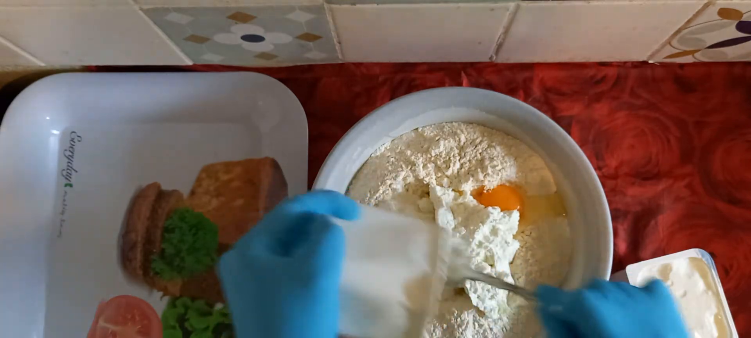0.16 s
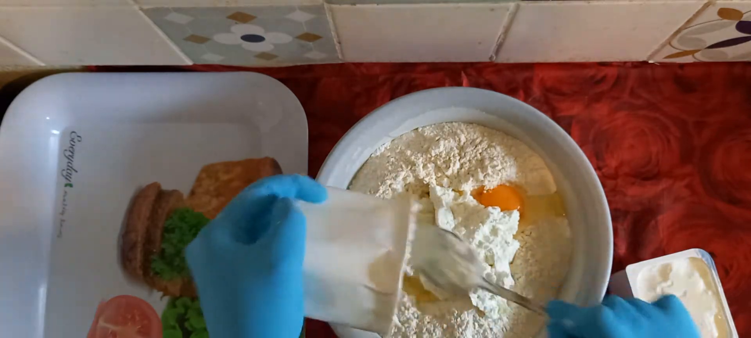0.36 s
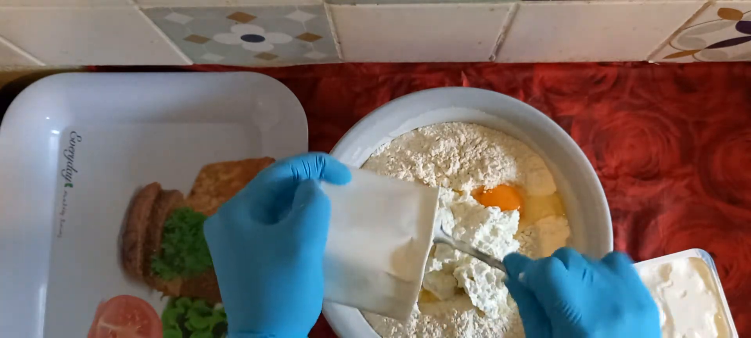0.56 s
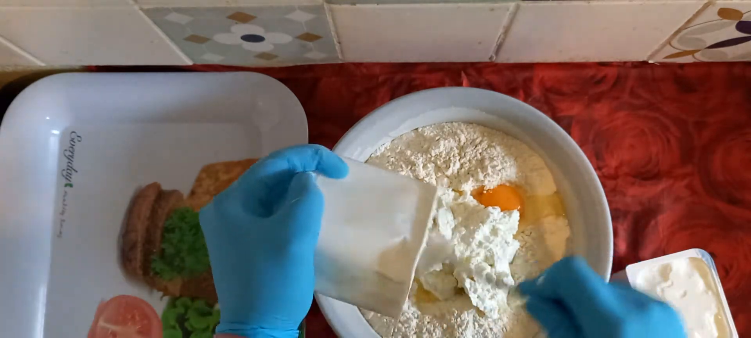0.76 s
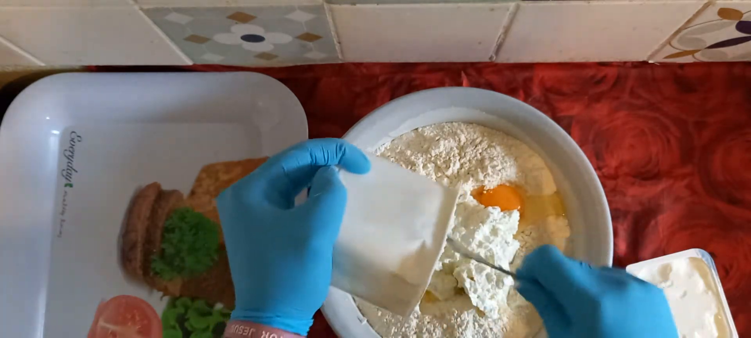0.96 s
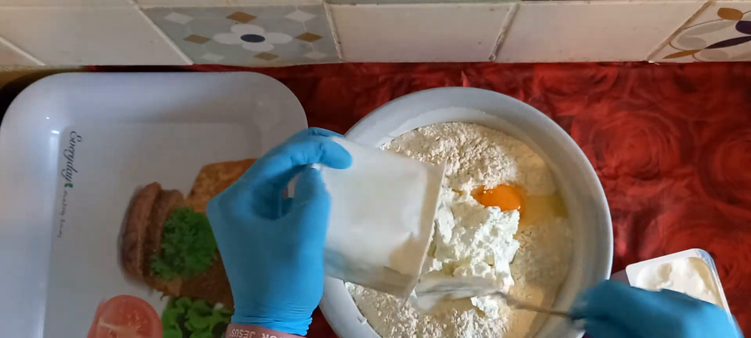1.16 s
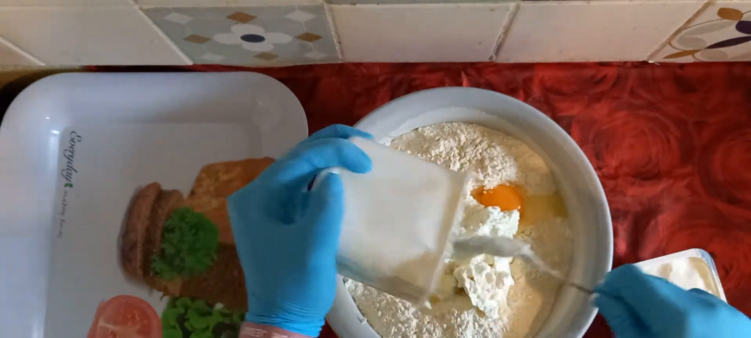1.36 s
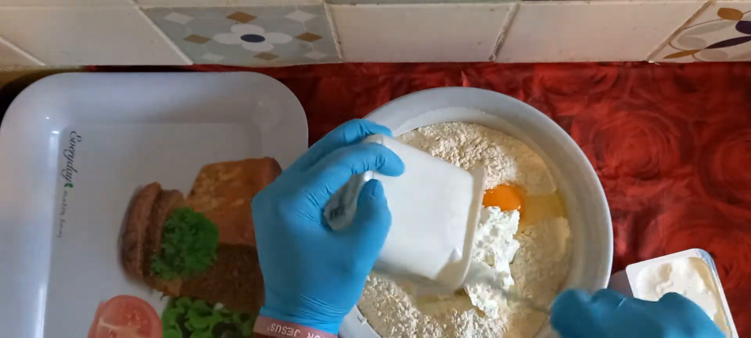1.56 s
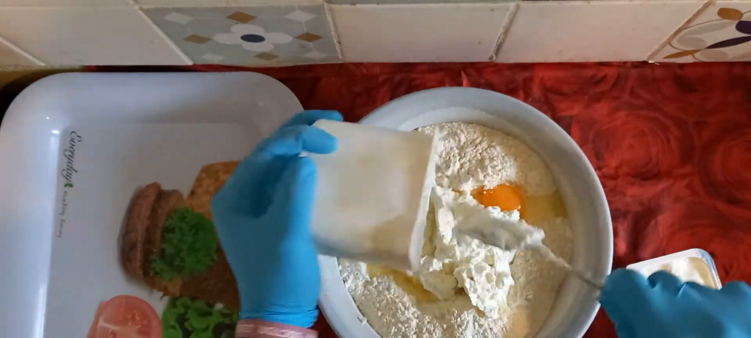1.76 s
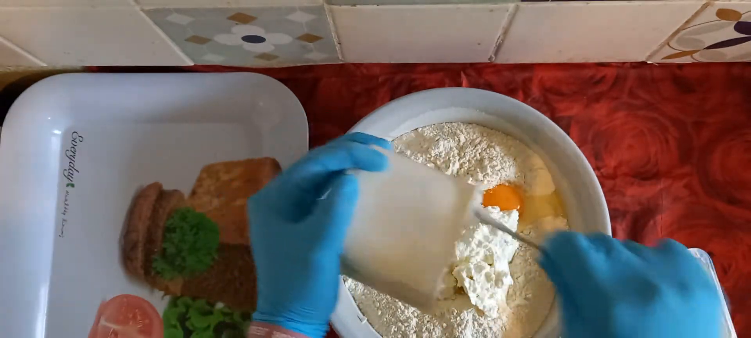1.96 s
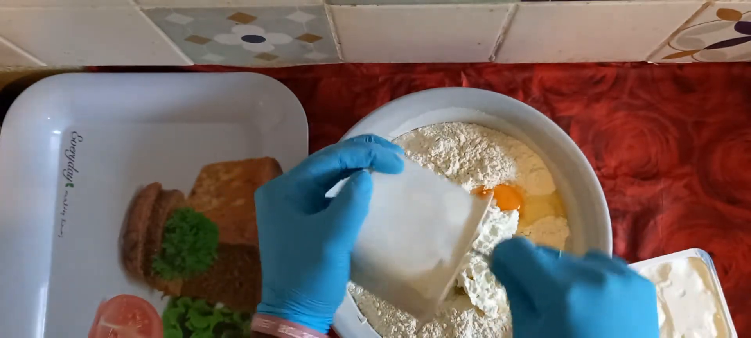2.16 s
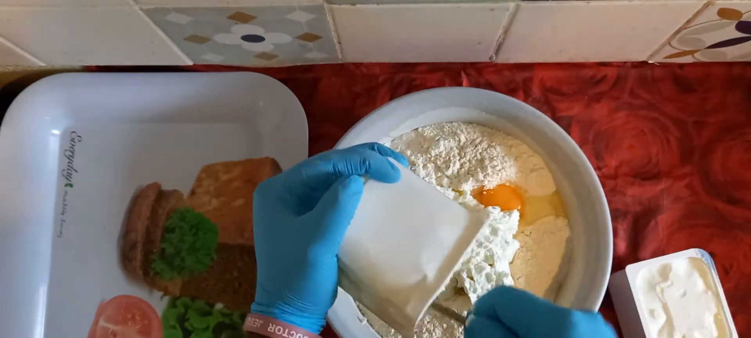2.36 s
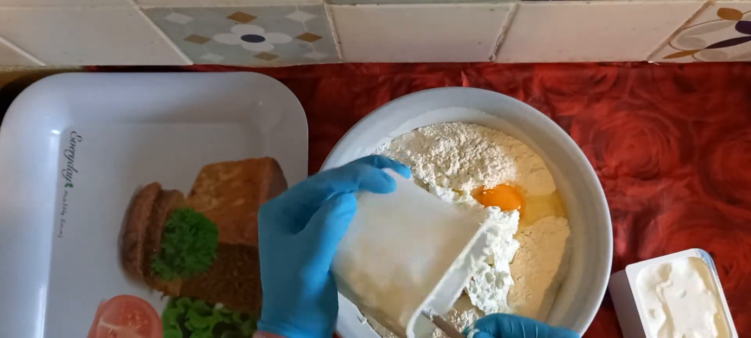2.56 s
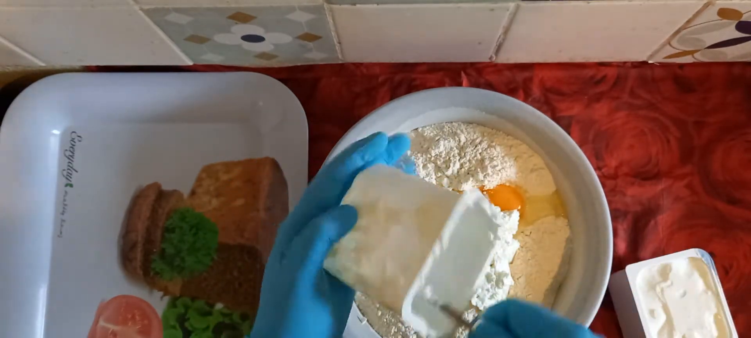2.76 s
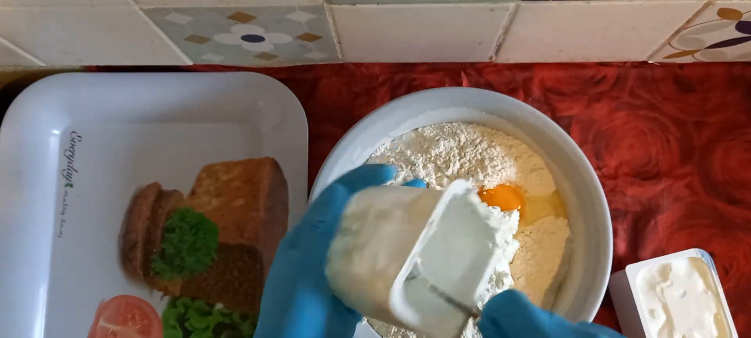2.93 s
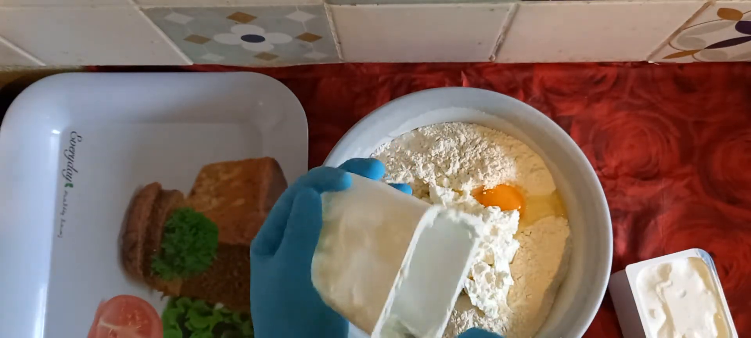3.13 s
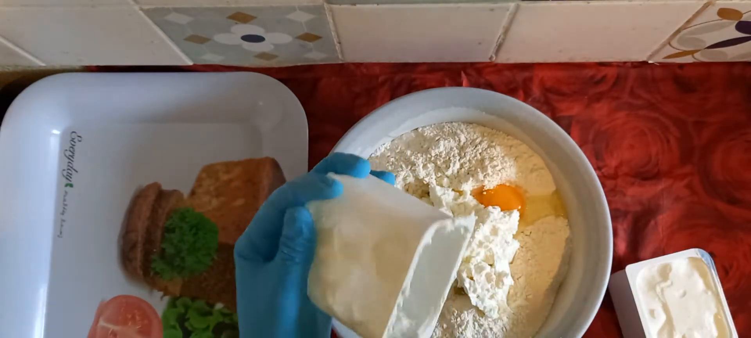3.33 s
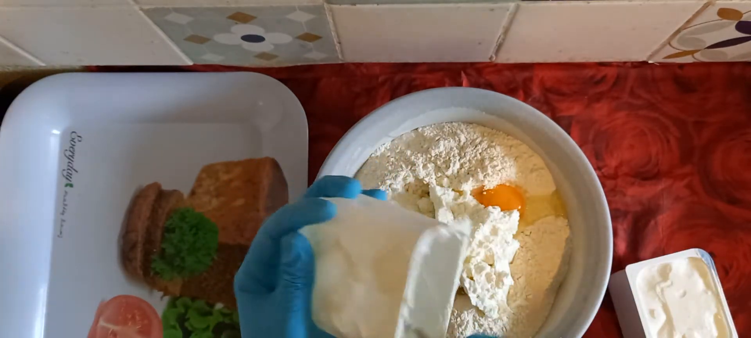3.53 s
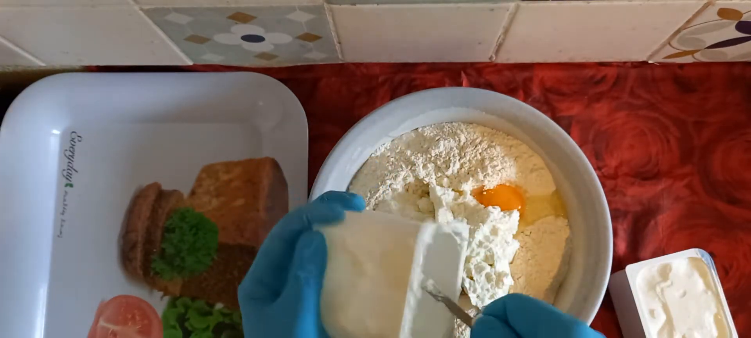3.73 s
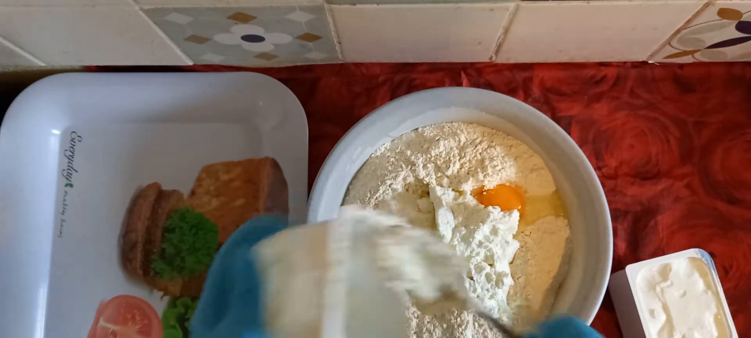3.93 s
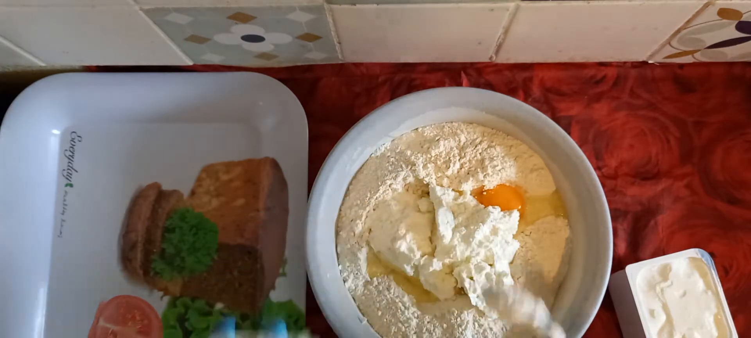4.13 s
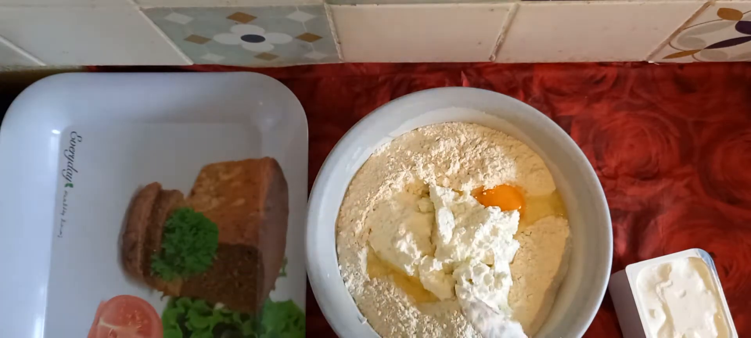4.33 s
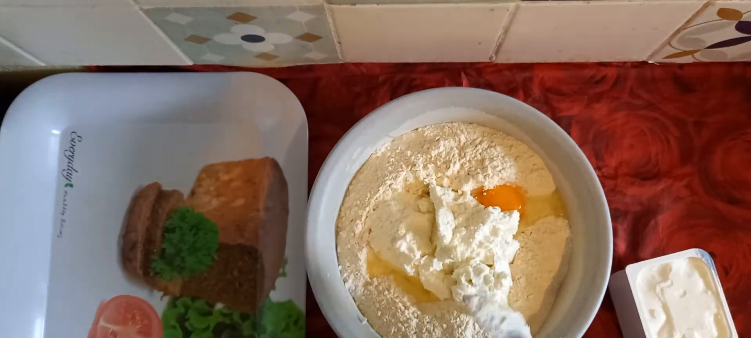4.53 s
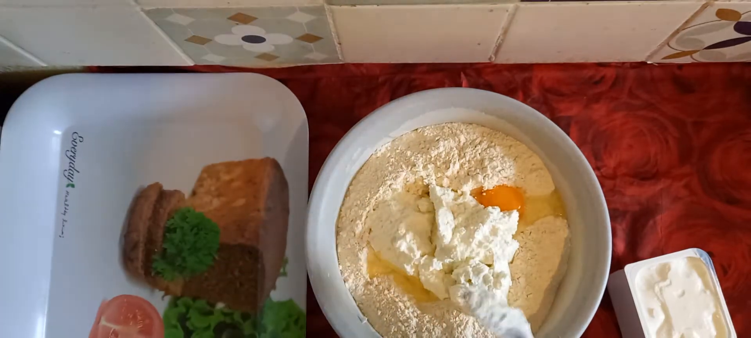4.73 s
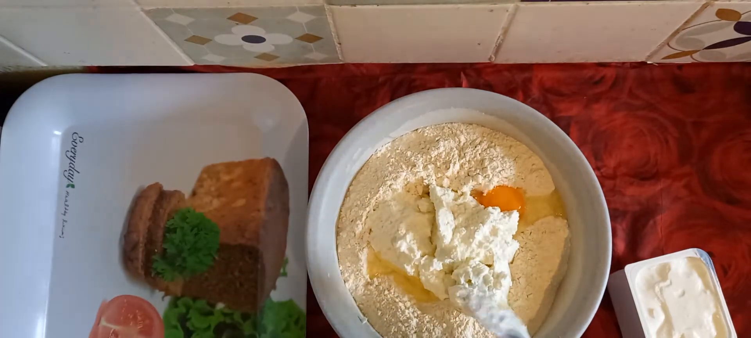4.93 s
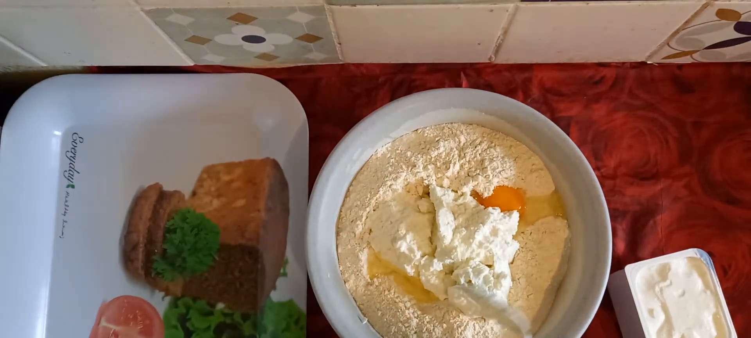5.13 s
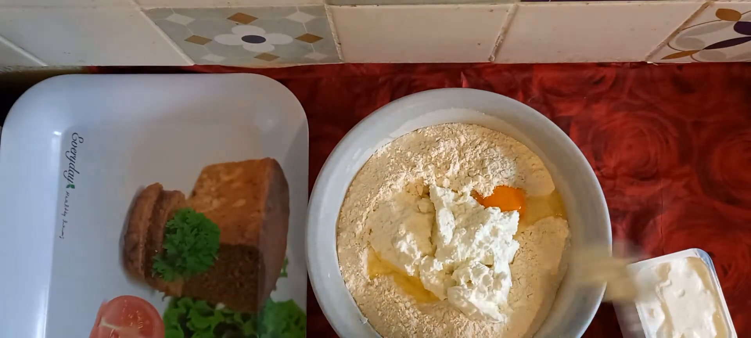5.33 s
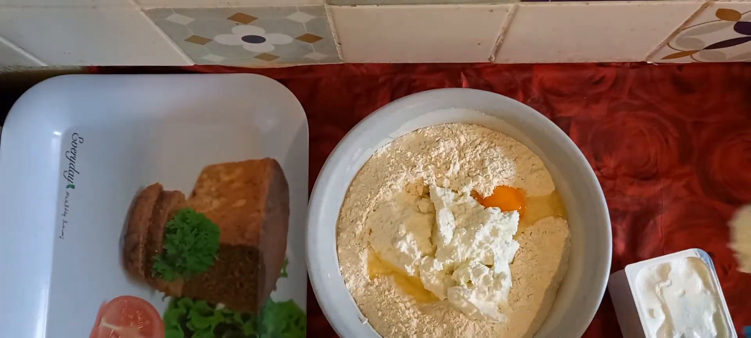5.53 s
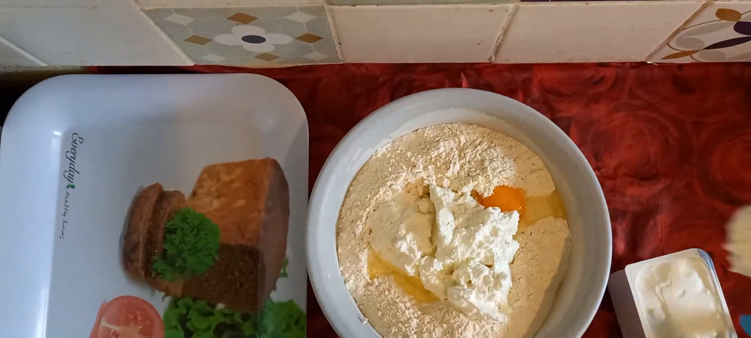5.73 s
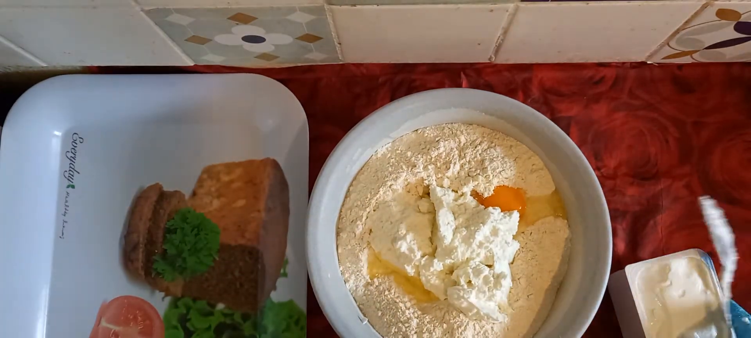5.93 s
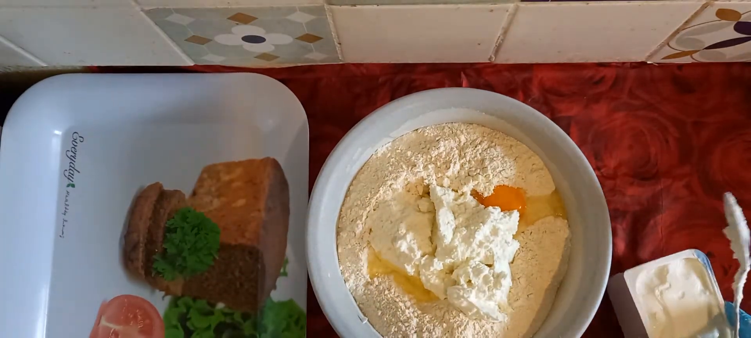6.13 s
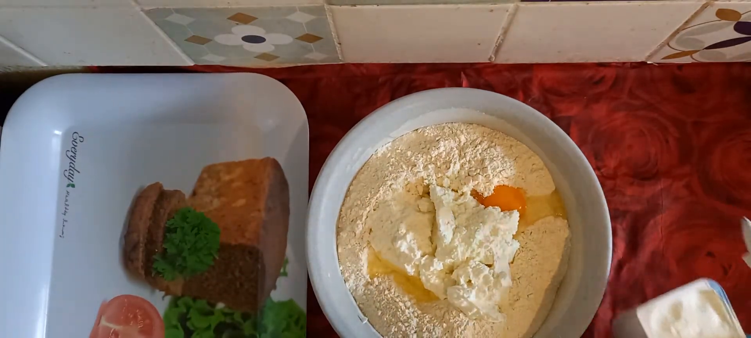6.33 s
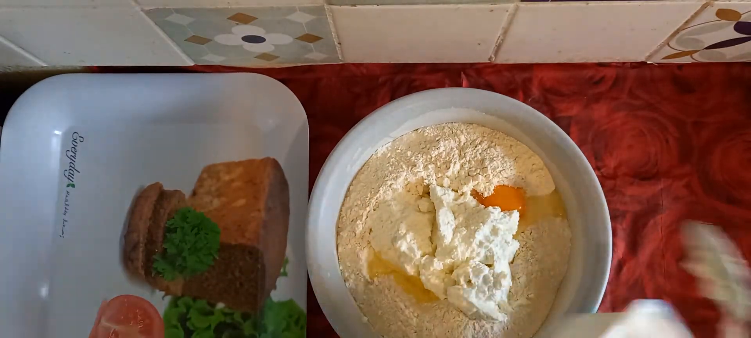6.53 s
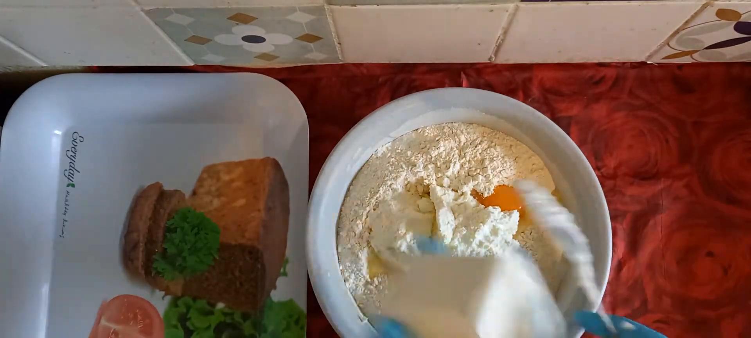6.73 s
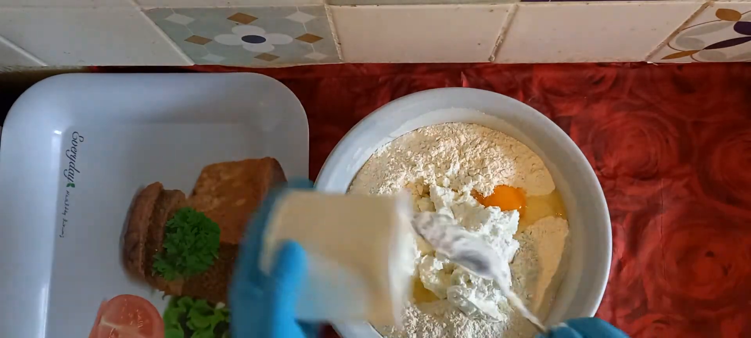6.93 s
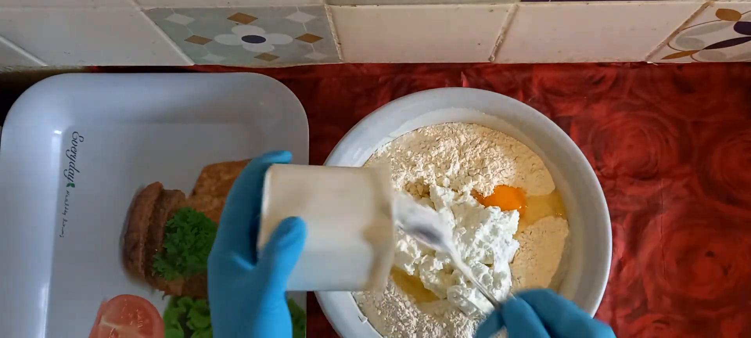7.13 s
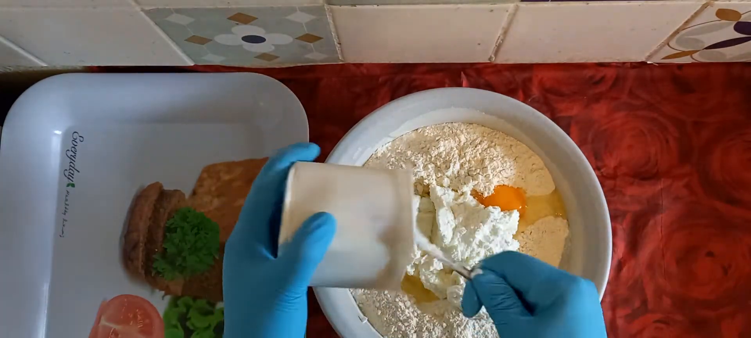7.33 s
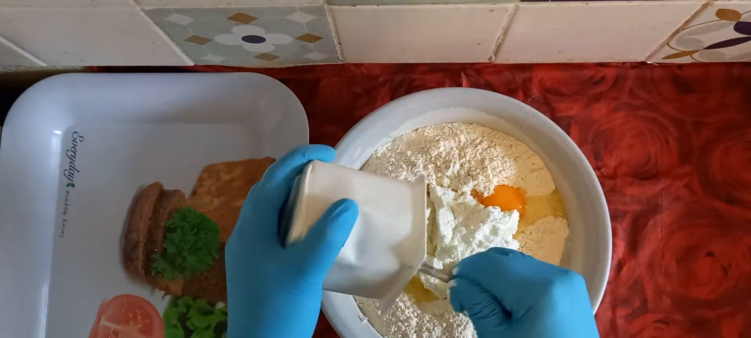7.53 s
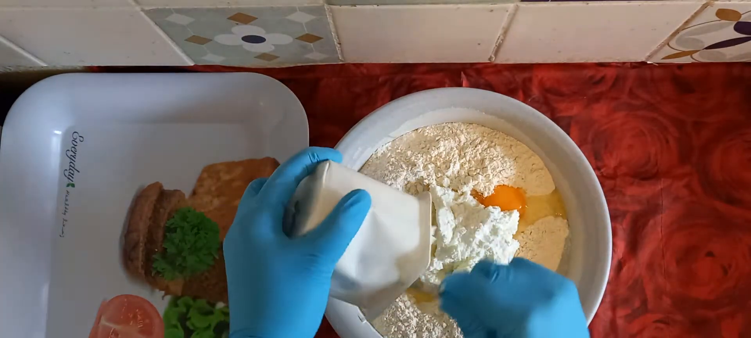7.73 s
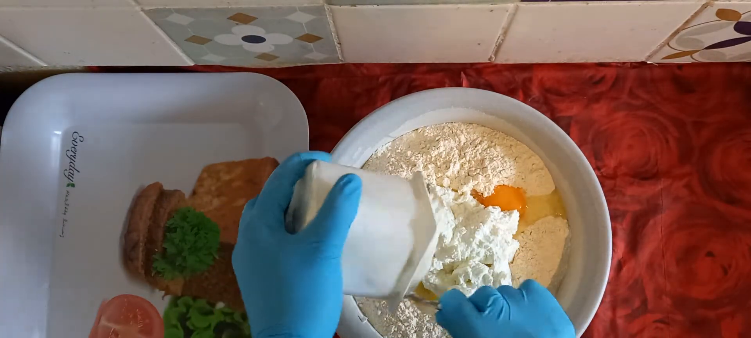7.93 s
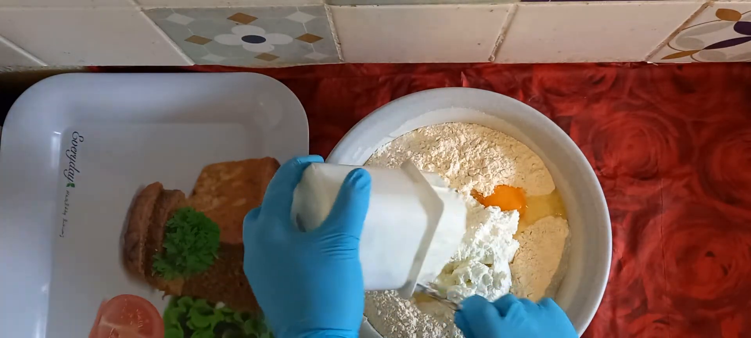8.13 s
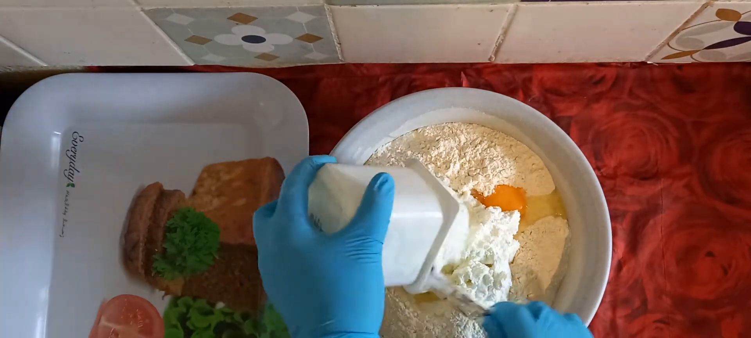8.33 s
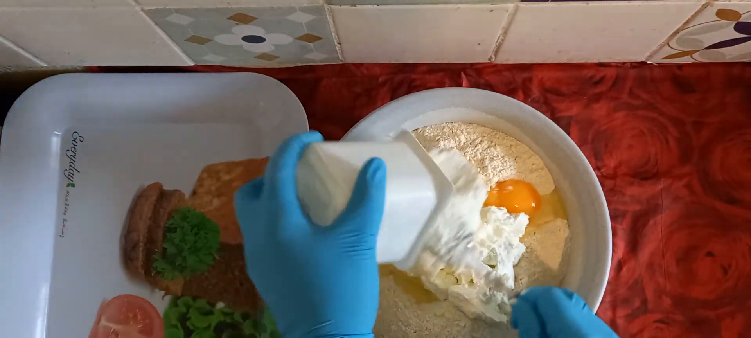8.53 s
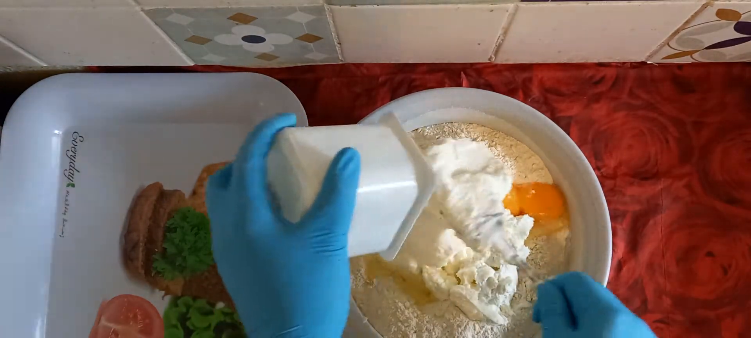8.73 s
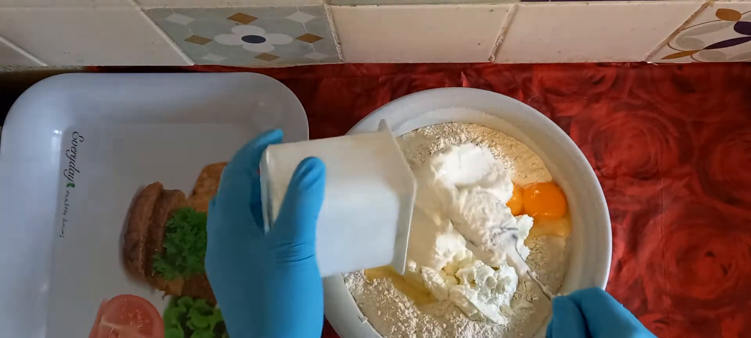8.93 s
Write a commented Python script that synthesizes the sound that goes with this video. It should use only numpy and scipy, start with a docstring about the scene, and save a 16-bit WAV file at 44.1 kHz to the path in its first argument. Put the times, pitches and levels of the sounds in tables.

```python
"""A fork scrapes soft cheese out of a thin plastic tub over a mixing bowl in a small, quiet kitchen.
First the fork knocks on the tub, which rings, and drags along it: clicks become judder, rasp and wet smear,
while gloved hands shift the tub with a low noise. Midway, five raps on the bowl shake the cheese off: the rim
cracks and the heavy bowl thuds. Then a second tub is knocked and scraped, more quietly at first.
Brief pitched noises squeak, bump and judder here and there; kitchen echoes and faint room noise surround all."""
import sys
import numpy as np
from scipy import signal
from scipy.fft import rfft, irfft, next_fast_len
from scipy.io import wavfile

SR = 44100
rng = np.random.default_rng(int(sys.argv[2]) if len(sys.argv) > 2 else 0)


def wav_record(signal):
    """Record a signal, one row per channel, as 16-bit PCM in the file named by sys.argv[1]."""
    frames = np.transpose(np.atleast_2d(signal))
    bounded = np.clip(frames, -1, 1)
    # unit amplitude maps onto the largest positive 16-bit level
    quanta = np.round(bounded * 32767).astype(np.int16)
    wavfile.write(sys.argv[1], SR, quanta)


N = 400428  # length of the scene [samples]
BLOW_TIME = np.arange(int(.7 * SR)) / SR  # time after a blow [s]

# Levels are relative: the functions below still balance the layers. t60 is the time to fade by 60 dB.
# The fork meets the tub: (time [s], pop [dB], pop pitch [Hz], wall flex [dB], hollow ring [dB],
# clack [dB], tick [dB])
FORK_KNOCKS = [(0.128, -29.5, 788, -41, -45, -53, -70), (0.243, -39.5, 726, -38.5, -49, -48, -46),
               (0.435, -24, 826, -35.5, -39.5, -32.5, -33.5), (0.651, -34, 610, -30, -33, -22.5, -30.5),
               (0.658, -16.5, 758, -26.5, -40, -22.5, -27.5), (0.687, -17, 822, -41, -38, -19, -32),
               (0.842, -29.5, 812, -35, -69, -39.5, -38), (1.005, -41, 636, -39, -49, -54, -52),
               (1.048, -15, 803, -35.5, -76, -21.5, -25.5), (1.103, -16, 718, -30.5, -65, -19.5, -23.5),
               (1.161, -42, 874, -37.5, -38, -39.5, -38), (1.329, -22, 785, -33.5, -28, -36, -70),
               (1.483, -22.5, 780, -31, -29, -38, -52), (1.947, -31, 815, -37.5, -37.5, -35.5, -39.5),
               (2.082, -30.5, 657, -40, -40, -37.5, -40), (2.282, -30, 1150, -33.5, -28.5, -39, -42),
               (2.287, -25.5, 740, -37.5, -31.5, -42, -37), (2.678, -8.5, 800, -21.5, -24, -22.5, -31),
               (2.744, -13.5, 573, -19.5, -14, -20.5, -58), (2.751, -12, 932, -18.5, -15, -16.5, -64),
               (2.913, -33, 900, -33.5, -50, -30, -31), (2.973, -21, 945, -27, -34.5, -47.5, -70),
               (3.064, -23, 800, -32, -32, -42, -61), (3.114, -15, 857, -19, -22.5, -26.5, -73),
               (3.164, -29, 747, -38, -26.5, -31, -30), (3.58, -20.5, 804, -27.5, -30.5, -47, -77),
               (3.59, -23, 735, -34, -37, -40.5, -64.5), (3.64, -19.5, 744, -36, -31, -22.5, -32),
               (3.662, -9, 744, -27.5, -19.5, -23.5, -28), (3.767, -31, 837, -36.5, -36.5, -50.5, -60),
               (3.803, -21, 930, -31, -31, -32, -36), (4.024, -27.5, 1057, -29.5, -43.5, -69, -62),
               (4.061, -27.5, 857, -24.5, -43.5, -66, -69.5), (6.873, -70, 650, -46, -51, -45, -41.5),
               (7.135, -40, 804, -63, -64, -37, -29), (7.775, -47, 650, -53, -35, -40, -48),
               (7.937, -28.5, 643, -34, -14.5, -27, -36.5), (8.815, -24, 665, -29, -30.5, -35, -76)]
# The fork is rapped on the bowl: (time [s], thud [dB], rim knock [dB], crack [dB])
BOWL_RAPS = [(4.251, -4.5, -38, -17.5), (4.436, -4, -33, -17), (4.629, -4.5, -44, -18),
             (4.826, -5.5, -40, -17.5), (5.023, -6.5, -9, -18)]
# Strokes of the fork through the tub: (start [s], length [s], wall friction [dB], rasp [dB], wet smear [dB])
FORK_STROKES = [(0.01, 0.017, -56, -55.5, -56), (0.107, 0.15, -53.5, -60, -66.5),
                (0.438, 0.074, -41, -54, -69), (0.577, 0.33, -61, -52, -58),
                (0.634, 0.062, -34, -38.5, -56), (0.84, 0.24, -59, -52.5, -57),
                (0.91, 0.18, -43.5, -47.5, -51), (1.095, 0.063, -39, -45, -62),
                (1.218, 0.22, -67, -63.5, -69), (1.371, 0.067, -42.5, -41, -49.5),
                (1.463, 0.12, -39.5, -50, -63.5), (1.55, 0.21, -53, -57, -70),
                (1.952, 0.43, -45.5, -54.5, -66.5), (2.228, 0.052, -41.5, -53.5, -59),
                (2.426, 0.17, -30.5, -38.5, -47), (2.617, 0.055, -22.5, -28, -48),
                (2.932, 0.14, -39, -52.5, -71), (3.099, 0.4, -43, -50.5, -62.5),
                (3.308, 0.028, -28, -40.5, -49.5), (3.68, 0.32, -48, -50.5, -59),
                (4.01, 0.23, -52, -56, -66), (4.538, 0.076, -38, -42, -46), (5.421, 0.051, -54, -59, -70.5),
                (5.563, 0.15, -61, -65.5, -83.5), (5.801, 0.14, -53.5, -67.5, -79),
                (5.98, 0.08, -65, -67, -80.5), (6.482, 0.033, -75, -65, -82), (6.552, .2, -65, -73.5, -75),
                (6.668, 0.025, -76, -56, -63), (6.892, 0.054, -43.5, -57, -83), (7, 0.1, -64, -63, -68),
                (7.129, .18, -47.5, -48, -54), (7.366, 0.27, -49, -54, -63),
                (7.693, 0.033, -47, -50.5, -66), (7.74, 0.018, -46, -43.5, -59),
                (7.792, 0.036, -51, -50.5, -62), (8.147, 0.48, -49, -63, -76),
                (8.676, 0.61, -56.5, -62.5, -74.5), (9.032, 0.058, -28.5, -41.5, -67)]
# The fork drags hard and the wall stutters: (start [s], length [s], wall pitch [Hz], level [dB])
HARD_DRAGS = [(2.435, 0.032, 307, -26.5), (2.496, 0.1, 314, -27), (2.62, .05, 324.6, -19),
              (3.323, 0.039, 330, -23.5), (3.38, 0.046, 263, -33.5), (3.466, 0.047, 290, -33),
              (7.448, 0.14, 276, -47.5), (7.71, 0.044, 512, -45), (8.289, 0.15, 475, -49.5),
              (8.456, .025, 790, -52)]
# Brief pitched sounds: squeaks, a soft bump and a low glove judder:
# (start [s], end [s], pitch [Hz], width [Hz], level [dB])
PITCHED_SOUNDS = [(2.547, 2.597, 2740, 910, -33), (3.78, 4.17, 1455, 130, -50.5),
                  (3.885, 4.219, 4930, 200, -58), (4.35, 4.393, 850, 150, -41),
                  (6.657, 6.712, 1710, 120, -55), (7.423, 7.7, 1970, 200, -54.5),
                  (7.427, 7.693, 3160, 90, -58), (8.33, 8.59, 120, 4, -44.5)]
# The hands turn or regrip the tub: (start [s], length [s], level [dB])
HAND_GRIPS = [(1.862, 0.048, -48), (2.11, 0.22, -57.5), (2.411, 0.33, -37), (3.006, 0.12, -39.5),
              (3.302, 0.037, -49), (3.433, 0.44, -55.5), (4.025, 0.045, -41.5), (6.877, 0.1, -38),
              (7.421, 0.11, -49), (8.16, 0.043, -47.5), (8.71, 0.33, -54), (8.997, 0.059, -48)]
# A tub is held in the air: (start [s], length [s], level [dB])
TUB_HOLDS = [(0.0, 3.7, -60.5), (6.859, 2.7, -61)]

# Ways the hand-damped tub can vibrate: (pitch [Hz], level [dB], t60 [s])
TUB_MODES = [(246.7, -3.5, 0.09), (315, -1, 0.052), (406, -4, 0.08), (473.5, -2, 0.077), (635.6, 1, 0.058),
             (779.6, -1, 0.1), (899.4, 2, 0.028), (1209, -5, 0.047), (1420, -5.5, 0.03), (1697, -6, 0.07),
             (1960, 2.5, 0.011), (2306, -1, 0.018), (2844, -9, 0.032), (3604, -9, 0.019)]
# Ways the laden bowl on the table can vibrate: (pitch [Hz], level [dB], t60 [s])
BOWL_MODES = [(55.6, -21, 0.4), (75.6, -16, 0.07), (144, -4.5, 0.077), (173.1, -1.5, 0.043),
              (208.3, -6, 0.079), (249.5, -2.5, 0.035), (281.6, -15, 0.22), (389.5, -16, 0.18),
              (476.7, -14, 0.13), (592, -17, 0.082), (718, -21, 0.086)]
# Deep boom of the bowl near 114 Hz, a single row: (pitch [Hz], level [dB], t60 [s])
BOWL_BOOM_MODE = (114, -7.5, .2)
# Ways the bowl's rim can vibrate: (pitch [Hz], level [dB], t60 [s])
RIM_MODES = [(763, 6.5, 0.027), (890, -5, 0.16), (1005, -1, 0.058), (1130, -5, 0.047), (1380, -6, 0.027)]

# Colours of the noisy parts, all as (frequency [Hz], level [dB per Hz]).
# Clack of fork on plastic: (frequency [Hz], level [dB per Hz])
CLACK_COLOUR = [(500, -30.5), (1100, -4), (1900, 1), (3100, 2.5), (4200, -2), (5500, -5.5), (6500, -18),
                (9000, -43)]
# Bright tick of the tines: (frequency [Hz], level [dB per Hz])
TICK_COLOUR = [(3500, -19), (6000, 3), (9000, -2.5), (11500, 0.5), (16000, -9.5)]
# Crowded vibrations of the tub's bottom: (frequency [Hz], level [dB per Hz])
BOTTOM_COLOUR = [(450, -18), (1100, 3), (2200, 4.5), (3100, -24)]
# Crack of metal on the bowl's rim: (frequency [Hz], level [dB per Hz])
CRACK_COLOUR = [(900, -3.5), (1500, -11), (1950, 2.5), (2400, -7), (3100, 1), (5400, -0.5), (6400, -7),
                (9800, -8.5), (11400, -2.5), (13000, -10), (16000, -14.5)]
# Rasp of tines on the wall: (frequency [Hz], level [dB per Hz])
RASP_COLOUR = [(600, -8.5), (1200, -1), (1900, 2.5), (2800, 3), (4000, -0.5), (5400, -2.5), (6600, -13),
               (10000, -20)]
# Wet fizz of smeared cheese: (frequency [Hz], level [dB per Hz])
SMEAR_COLOUR = [(3000, -13.5), (6000, -3.5), (8000, -6.5), (10000, -5), (12000, 0), (16000, -9)]
# Low rumble of hands and bowl: (frequency [Hz], level [dB per Hz])
RUMBLE_COLOUR = [(20, -25.5), (40, -16), (55, -1), (80, -8.5), (115, -0.5), (160, -8.5), (260, -16),
                 (600, -46)]
# Air of the room: (frequency [Hz], level [dB per Hz])
AIR_COLOUR = [(20, -28), (50, 3.5), (70, -7.5), (115, 7), (190, -9), (360, 4.5), (600, -2.5), (1100, -16.5),
              (2400, -11), (5000, -24), (8000, -28), (16000, -37.5)]

# How alike left and right are: (frequency [Hz], likeness [1 = same, 0 = unrelated, -1 = opposite])
STEREO_LIKENESS = [(80, .997), (125, .98), (250, .89), (500, .72), (1000, .44), (2000, .32), (8000, .2),
                   (12000, -.15)]
# Echoes of the kitchen: (frequency [Hz], echo level [dB], t60 [s])
KITCHEN_ECHO = [(117, -6, 0.15), (300, -13.5, 0.19), (800, -11, 0.39), (2000, -11.5, 0.065),
                (5000, -13.5, 0.072), (12000, -13, 0.23)]

# A stroke bites, eases off as the fork travels, and lets go.
STROKE_ATTACK_S, STROKE_SAG_DB_PER_S, STROKE_RELEASE_T60_S = 0.016, 8.5, 0.22
GRIP_ATTACK_S, GRIP_SAG_DB_PER_S, GRIP_RELEASE_T60_S = 0.036, 0, 0.33
SLIPS_PER_S, SLIP_UNEVEN, SLIP_SPREAD_DB, SLIP_T60_S, WALL_BEND_OCTAVES = 105, .4, 2.5, .05, .04
# The shifting hollow between fork, cheese and wall colours the scrape.
HOLLOW_S, HOLLOW_WANDER_OCTAVES, HOLLOW_REFLECTS = .0011, .22, 0.45
PITCH_WAVER = 0.012  # spread of the pitch bend, as a share
ROCK_DB, ROCK_T60_S = -26, 0.74  # the bowl rocks on after a rap; level relative to the tabled thud
BOUNCE_S, BOUNCE_DB = 0.01272, -12.5  # the bowl lands a second time; time counts from the crack
AIR_DB = -60.5
MIC_LOW_CUT_HZ, CUTOFF_HZ = 44, 16000


def knocks():
    """The spot that the fork meets decides the wall's pop, how much it flexes and how the tines click."""
    out = np.zeros((2, N))
    for s, pop_db, pop_hz, flex_db, hollow_db, clack_db, tick_db in FORK_KNOCKS:
        # this knock's push on the tub at each pitch
        push = [(480, flex_db), (740, pop_db - 10.5), (1000, pop_db - 1.5),
                (1250, hollow_db - 6.5), (2500, clack_db)]
        modes = [(hz, db + at_hz(push, hz), t60) for hz, db, t60 in TUB_MODES]
        body = ring(modes, contact=0.0026, uneven_db=5.5, shift=0.033, flip=-1.006)
        pop_mode = (pop_hz, pop_db, .042)
        pop = ring([pop_mode], contact=.003, uneven_db=0, shift=0, flip=1)
        clack = from_db(clack_db + 1) * burst(CLACK_COLOUR, t60=0.026, contact=0.0017)
        tick = from_db(tick_db - 5.5) * burst(TICK_COLOUR, t60=0.036, contact=.0008)
        bottom = from_db(hollow_db - 3.5) * burst(BOTTOM_COLOUR, t60=.026, contact=.001)
        add(out, s, body + pop + bottom + clack + pan(tick, left_db=2.0))
        # the clack scatters round the kitchen
        scatter_db = max(clack_db, hollow_db) - 20.0
        add(out, s, from_db(scatter_db) * burst(RASP_COLOUR, t60=0.18, contact=0.006))
        # the tines skid for an instant before they land
        skid = from_db(clack_db - 17.5) * burst(RASP_COLOUR, t60=.02, contact=0.0013)
        add(out, s - .004, skid)
    return out


def scraping():
    """Tines judder over the wall and rasp on it; tiny pockets burst in the smeared cheese."""
    levels = np.zeros((3, N))
    for start, length, *levels_db in FORK_STROKES:
        shape = gesture(start, length, STROKE_ATTACK_S, STROKE_SAG_DB_PER_S, STROKE_RELEASE_T60_S)
        add(levels, start, np.outer(from_db(levels_db), shape))
    friction, rasp, smear = levels
    # (frequency [Hz], level [dB per Hz])
    soft_contact = [(60, -19.0), (190, -2.0), (350, 3), (600, -5.0), (950, -1.5), (1500, -5.0), (5000, -22.5)]
    soft_clicks = coloured(slips(per_s=300, spread_db=3.5), soft_contact)[:, :N]
    judder = tub_wall(soft_clicks, damping=1.9)
    # now and then a tine catches and lets go
    catch_clicks = coloured(slips(per_s=70, spread_db=1.0), RASP_COLOUR)[:, :N]
    catches = tub_wall(catch_clicks, damping=1.8)
    grit = hollow(coloured(slips(per_s=1800, spread_db=3.0), RASP_COLOUR)[:, :N])
    fizz = hollow(coloured(slips(per_s=4500, spread_db=2.5), SMEAR_COLOUR)[:, :N])
    pressure = from_db(2.8 * drift(rate=70))
    wall = pan(from_db(-5.5) * friction * judder, left_db=-4.0)
    rasping = rasp * (from_db(-2.0) * grit + from_db(-12) * catches)
    wet = from_db(2.5) * smear * fizz
    return pressure * (wall + rasping + wet)


def drags():
    """Tines stick and slip unevenly; each slip kicks the bulging wall, whose pitch moves as it bends."""
    out = np.zeros((2, N))
    for start, length, hz, db in HARD_DRAGS:
        gaps, strengths, bends = rng.standard_normal((3, 60))
        gaps = np.exp(SLIP_UNEVEN * gaps) / SLIPS_PER_S
        times = np.cumsum(gaps) - gaps[0]
        pitches = hz * 2 ** (WALL_BEND_OCTAVES * np.cumsum(bends))
        for t, strength, pitch in zip(times, strengths, pitches):
            if t < length:
                wall = ring([(pitch, db, SLIP_T60_S)], contact=.0012, uneven_db=0, shift=0, flip=1)
                add(out, start + t, from_db(SLIP_SPREAD_DB * strength) * wall)
    return pan(out, left_db=-0.5)


def pitched_sounds():
    """Brief squeaks, a soft bump and a low glove judder: noise round one pitch, each swelling and dying."""
    out = np.zeros((2, N))
    for start, end, hz, width, db in PITCHED_SOUNDS:
        size = int((end - start) * SR) + 2
        skirts = hz * 2 ** np.linspace(-1, 1, 201)  # an octave to each side
        peak_db = -20 * np.log10(1 + ((skirts - hz) / width) ** 2)
        peak = np.transpose([skirts, peak_db])
        tone = rms_one(waver(noise(peak, size=size)))
        swell = np.sin(np.linspace(0, np.pi, size))
        add(out, start, from_db(db) * tone * swell)
    return out


def raps():
    """Metal cracks on the rim, and a moment later the heavy bowl thuds on the table and rocks."""
    out = np.zeros((2, N))
    for s, thud_db, rim_db, crack_db in BOWL_RAPS:
        bowl = ring([BOWL_BOOM_MODE] + BOWL_MODES, contact=.003, uneven_db=1.5, shift=.012, flip=1)
        thud = from_db(thud_db - 1) * bowl
        rim = from_db(rim_db - 4.5) * ring(RIM_MODES, contact=0.0024, uneven_db=1.5, shift=0.0078, flip=-0.97)
        crack = burst(CRACK_COLOUR, t60=0.019, contact=0.0027)
        crack_tail = from_db(-16.5) * burst(CRACK_COLOUR, t60=0.28, contact=.004)
        # the soft filling slumps after the blow
        slump = from_db(thud_db - 22.0) * burst(RUMBLE_COLOUR, t60=0.09, contact=0.044)
        rock = from_db(thud_db + ROCK_DB) * burst(RUMBLE_COLOUR, t60=ROCK_T60_S, contact=0.033)
        add(out, s + 0.0011, thud + rim + slump + rock)
        add(out, s + BOUNCE_S, from_db(BOUNCE_DB) * thud)
        add(out, s, from_db(crack_db + 4.0) * (crack + crack_tail))
    return out


def handling():
    """Gloved fingers flex the tub with a low rumble to move it; holding it, they rumble and rustle faintly."""
    grips, holds = np.zeros((2, 1, N))
    for level, rows in ((grips, HAND_GRIPS), (holds, TUB_HOLDS)):
        for start, length, db in rows:
            shape = gesture(start, length, GRIP_ATTACK_S, GRIP_SAG_DB_PER_S, GRIP_RELEASE_T60_S)
            add(level, start, np.outer(from_db(db), shape))
    rumble = (grips + holds) * noise(RUMBLE_COLOUR)
    rustle = holds * from_db(-12.5) * noise(SMEAR_COLOUR)
    return rumble + rustle


def kitchen(x):
    """Diffuse echoes from tiles and worktop, dying at their own pace in each octave."""
    response = 0
    for hz in 90 * 2. ** np.arange(8):
        white = noise([(20, 0), (SR / 2, 0)], size=len(BLOW_TIME))
        octave = signal.butter(2, [hz / np.sqrt(2), hz * np.sqrt(2)], "band", fs=SR, output="sos")
        band = signal.sosfilt(octave, white)
        tail = fade(at_hz(KITCHEN_ECHO, hz, axis=2), contact=0.015)
        even_tail = tail / np.sqrt(np.sum(tail ** 2))  # long and short tails get equal energy
        response = response + from_db(at_hz(KITCHEN_ECHO, hz)) * band * even_tail
    both_sides = x[:1] + x[1:]
    return signal.fftconvolve(both_sides, response / np.sqrt(2), axes=1)[:, :N]


def room_air():
    """The quiet room is a steady, faint noise, strongest in the low range."""
    return from_db(AIR_DB) * noise(AIR_COLOUR)


def ring(modes, contact, uneven_db, shift, flip):
    """A blow sets each mode ringing with its own strength; flip -1 starts neighbours in opposite directions."""
    out = np.zeros((2, len(BLOW_TIME)))
    for k, (hz, db, t60) in enumerate(modes):
        strength, detune, side = rng.uniform(-1, 1, 3)
        # high modes reach the two sides out of step
        apart = np.arccos(at_hz(STEREO_LIKENESS, hz)) / 2 * np.sign(side)
        # grip and filling shift the modes a little from blow to blow
        shifted_hz = hz * (1 + shift * detune)
        phase = 2 * np.pi * shifted_hz * BLOW_TIME + apart * np.array([[1], [-1]])
        gain = flip ** k * from_db(db + uneven_db * strength)
        out += gain * fade(t60, contact) * np.cos(phase)
    return out


def burst(spectrum, t60, contact):
    """Crowded high modes or loose rumbling make a short noise that fades."""
    return noise(spectrum, size=len(BLOW_TIME)) * fade(t60, contact)


def fade(t60, contact):
    """Vibration builds up while the contact lasts [s], then dies away."""
    build_up = np.minimum(BLOW_TIME / max(contact, 1e-4), 1)
    return build_up * from_db(-60 * np.maximum(BLOW_TIME - contact, 0) / t60)


def tub_wall(clicks, damping):
    """Clicks pass through the tub's modes, whose ringing the pressing fork shortens; rms 1."""
    out = 0
    for k, (hz, db, t60) in enumerate(TUB_MODES):
        r = from_db(-60 * damping / (t60 * SR))  # what is left of the ringing after one sample
        w = 2 * np.pi * hz / SR
        resonance = signal.lfilter([np.sin(w), -np.sin(w)], [1, -2 * r * np.cos(w), r * r], clicks)
        out = out + (-1) ** k * from_db(db) * resonance / w
    return rms_one(out)


def slips(per_s, spread_db):
    """Two trains of tiny stick-slip clicks of uneven size."""
    shape = (2, next_fast_len(N))
    sizes = from_db(spread_db * np.minimum(rng.exponential(1, shape), 4))
    return (rng.random(shape) < per_s / SR) * sizes * np.sign(rng.standard_normal(shape))


def hollow(x):
    """Two quick reflections from a moving cavity give resonances that slide about."""
    lag = HOLLOW_S * SR * 2 ** (HOLLOW_WANDER_OCTAVES * drift(rate=12))
    n = np.arange(N)
    out = x
    for k in (1, 2):
        reflection = np.array([np.interp(n - k * lag, n, side) for side in x])
        out = out + HOLLOW_REFLECTS ** k * reflection
    return rms_one(out)


def waver(x):
    """Changing pressure bends the pitch a little."""
    n = np.arange(x.shape[1])
    bent = np.cumsum(1 + PITCH_WAVER * drift(rate=34)[:len(n)])
    return np.array([np.interp(bent, n, side) for side in x])


def gesture(start, length, attack, sag_db_per_s, release_t60):
    """Gain of one movement of the hand: attack, a hold that may slowly sink, release."""
    t = np.arange(int((length + 1.5 * release_t60) * SR)) / SR
    fall_db = sag_db_per_s * np.minimum(t, length) + 60 * np.maximum(t - length, 0) / release_t60
    return np.minimum(t / attack, 1) * from_db(-fall_db)


def drift(rate):
    """A slow random wander through `rate` new values a second, with a spread near 1."""
    steps = np.arange(N) / SR * rate
    return np.interp(steps, np.arange(N // 20), rng.standard_normal(N // 20))


def noise(spectrum, size=N):
    """Smooth stereo noise of the given colour."""
    return coloured(rng.standard_normal((2, next_fast_len(size))), spectrum)[:, :size]


def coloured(pair, spectrum):
    """Two unrelated signals become a stereo sound of the given colour, alike in the bass; rms 1."""
    hz = np.fft.rfftfreq(pair.shape[1], 1 / SR)
    mid, side = rfft(pair) * from_db(at_hz(spectrum, hz))
    alike = np.clip(at_hz(STEREO_LIKENESS, hz), -.999, .999)
    left_right = np.sqrt(1 + alike) * mid + np.sqrt(1 - alike) * side * [[1], [-1]]
    return rms_one(irfft(left_right, pair.shape[1]))


def at_hz(points, hz, axis=1):
    """Read a column of a table, blending between rows on a log-frequency axis."""
    points = np.array(points)
    return np.interp(np.log(np.maximum(hz, 1)), np.log(points[:, 0]), points[:, axis])


def from_db(db):
    """Decibels to gain."""
    return 10 ** (np.asarray(db) / 20)


def rms_one(x):
    """Scale a stereo pair so that the average of its sides has rms 1."""
    return x / np.sqrt(np.mean(x.mean(0) ** 2) + 1e-20)


def add(out, s, sound):
    """Mix a sound in at a time [s]."""
    start = max(int(s * SR), 0)
    out[:, start:start + sound.shape[1]] += sound[:, :N - start]


def pan(x, left_db):
    """Make the left side louder than before, against the right, by so many dB."""
    return x * from_db(left_db / 2 * np.array([[1], [-1]]))


def scene():
    """Fork, tub and bowl close by in a quiet kitchen; the blows already bring tails, so they echo less."""
    taps, blows = knocks(), raps()
    movement = scraping() + drags() + pitched_sounds() + handling()
    echoes = kitchen(movement + from_db(-4) * taps + from_db(-9) * blows)
    return taps + blows + movement + echoes + room_air()


def record(dry):
    """The microphone drops the deep bass, the highest peaks are rounded, the top is cut."""
    low_cut = signal.butter(4, MIC_LOW_CUT_HZ, "high", fs=SR, output="sos")
    heard = signal.sosfilt(low_cut, dry)
    rounded = .92 * heard / (1 + heard ** 6) ** (1 / 6)
    top_cut = signal.ellip(10, .1, 80, CUTOFF_HZ, fs=SR, output="sos")
    return signal.sosfilt(top_cut, rounded)


dry = scene()
out = record(dry)
wav_record(out)
```